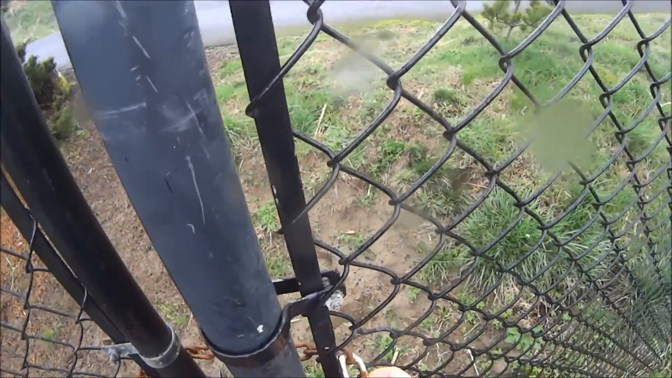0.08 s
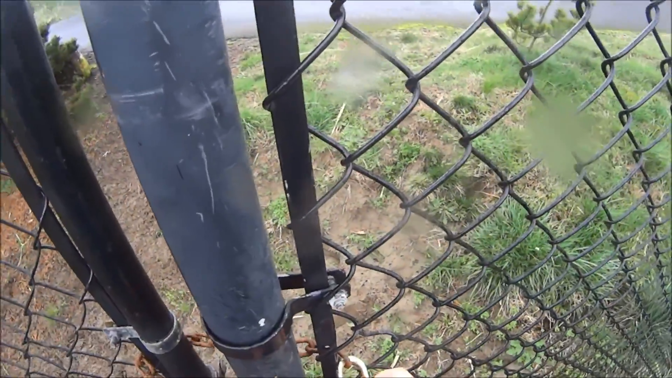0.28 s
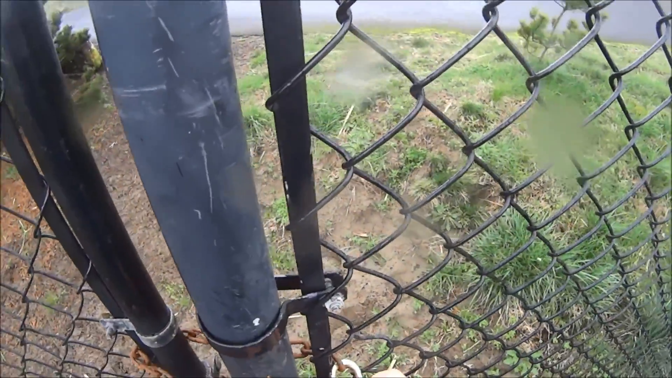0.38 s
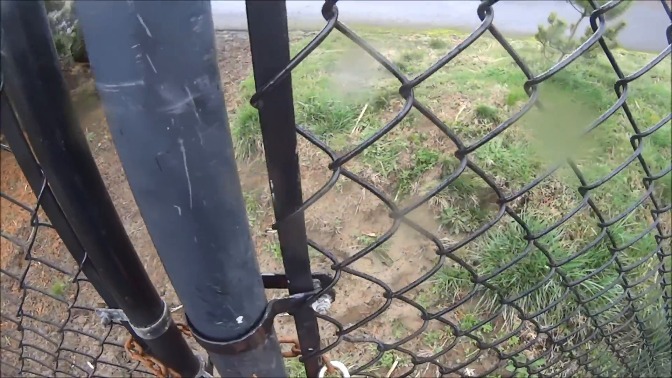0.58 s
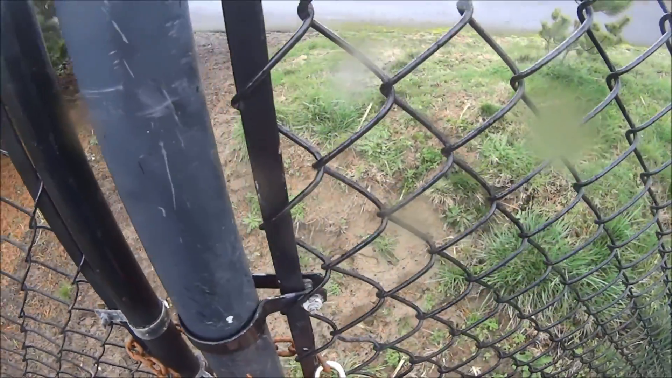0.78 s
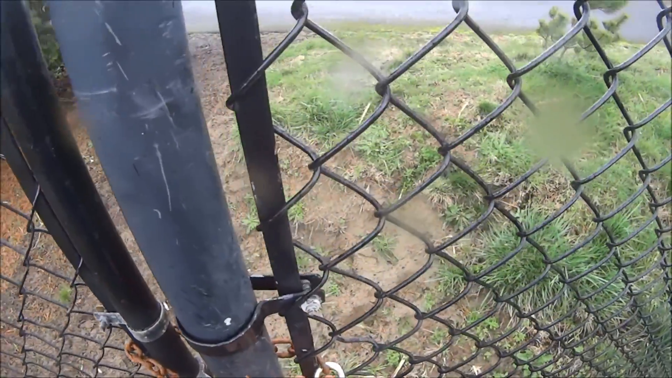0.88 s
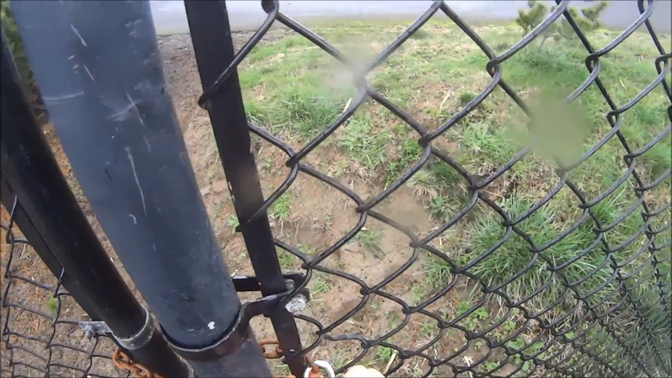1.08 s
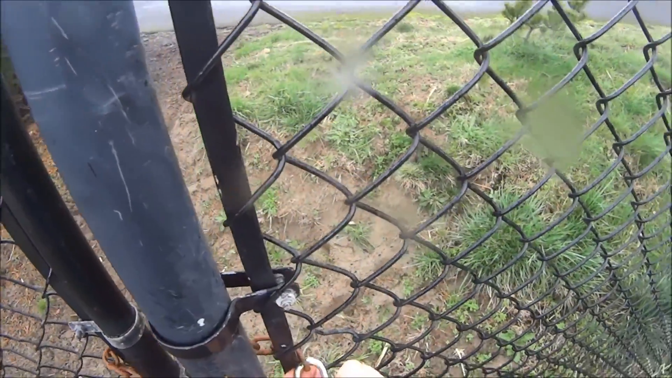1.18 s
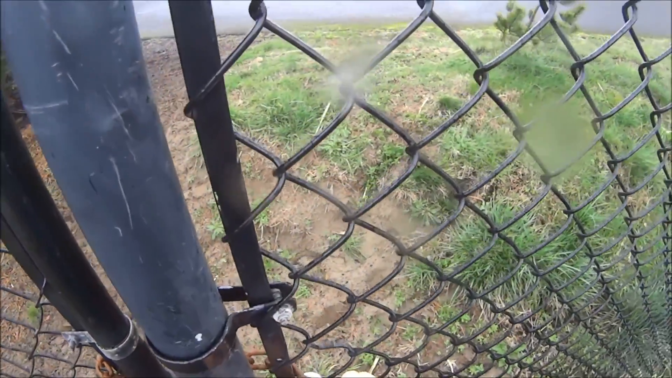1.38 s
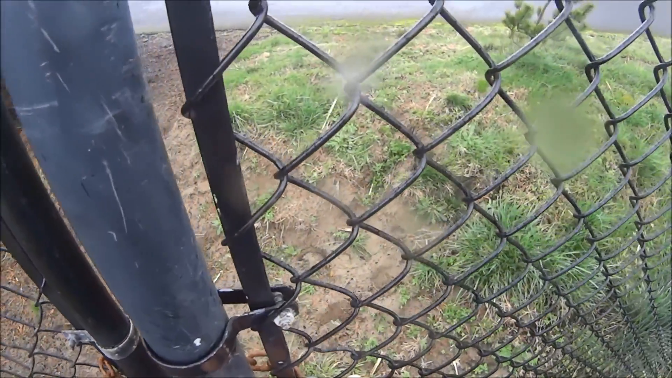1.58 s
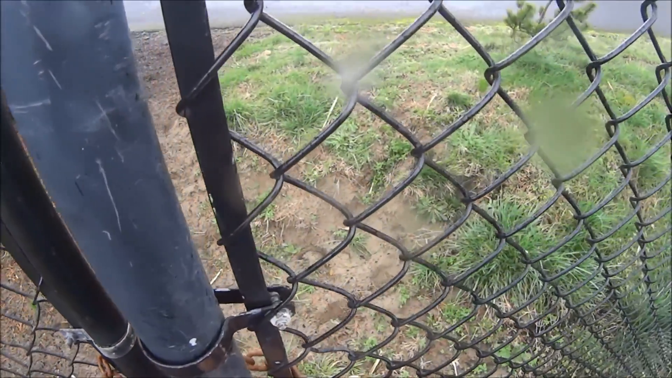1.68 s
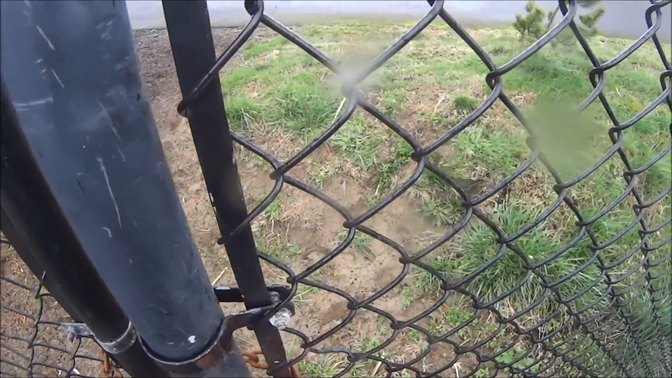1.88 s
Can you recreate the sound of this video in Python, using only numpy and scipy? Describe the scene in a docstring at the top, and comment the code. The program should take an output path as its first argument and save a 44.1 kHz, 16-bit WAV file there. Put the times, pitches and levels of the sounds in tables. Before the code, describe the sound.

A chain-link gate rattles close by as it is latched. Wire mesh rustles and ticks with dull hollow taps through the first half second. The steel latch clinks sharply three times around 0.4 to 0.5 seconds, rasps briefly near 0.65 and 0.9, and clinks again from 1.05 to 1.3. More taps follow, then a dead knock and small scrape at 1.8. Faint hiss and wind rumble continue throughout.

```python
"""Wire mesh rustles and ticks over faint outdoor air and wind rumble: a chain-link gate is being
handled and latched, close to the stereo microphone of a small camera. Dull taps ring briefly in
something small and hollow. The steel latch clinks as it is struck and rasps as it slides,
and one dead knock comes near the end. The fence rings on after each blow."""
import sys
import numpy as np
from scipy import signal
from scipy.fft import rfft, irfft
from scipy.io import wavfile

SR = 44100
rng = np.random.default_rng(int(sys.argv[2]) if len(sys.argv) > 2 else 0)


def master_out(mix):
    """Clip the mix to full scale and print it as 16-bit PCM to the path in sys.argv[1]."""
    frames = np.transpose(np.atleast_2d(mix))
    ceiling = np.clip(frames, -1, 1)
    pcm = np.round(ceiling * 32767).astype(np.int16)
    wavfile.write(sys.argv[1], SR, pcm)


N = 83790
T = np.arange(8192) / SR  # time axis of one contact, s
HZ = np.fft.rfftfreq(len(T), 1 / SR)
TAP_LIKENESS, TAP_SNAP, WIRE_LIKENESS = 0.49, 0.2, 0.81  # likeness: 1 is the same left and right

# how strongly the mesh stirs: t/s, level/dB
MESH_MOTION = [(0, -48.5), (.085, -41.5), (.13, -56), (.23, -43), (.35, -55.5), (.42, -47), (.6, -64),
               (1.1, -62.5), (1.9, -83)]
# main modes of the steel latch, a low pair and a high pair: f/Hz, t60/s
LATCH_MODES = [(2218, 0.16), (2342, 0.054), (6335, 0.11), (6555, 0.038)]
# spectrum of steel meeting steel: f/Hz, level/dB
STEEL_COLOUR = [(300, -51), (1000, -16), (1870, -9), (2300, -1.5), (4400, -5), (5400, -14.5), (7200, -12),
                (11000, -27.5)]


def amp(db):
    """Decibels to gain."""
    return 10 ** (np.asarray(db) / 20)


def unit(x):
    """Scales to rms 1."""
    return x / np.sqrt(np.mean(x ** 2) + 1e-20)


def read(points, hz):
    """Reads a curve on a log-frequency axis."""
    f, value = np.transpose(points)
    return np.interp(np.log(hz + 1), np.log(f), value)


def add(mix, start, sound):
    """Mixes a stereo sound in at start seconds."""
    part = mix[:, max(round(start * SR), 0):][:, :sound.shape[1]]
    part += sound[:, :part.shape[1]]


def stereo_noise(likeness, size):
    """Left and right noise that share the given part of their power."""
    noise = rng.standard_normal((3, size))
    return np.sqrt(likeness) * noise[0] + np.sqrt(1 - likeness) * noise[1:]


def colour(x, points, tilt_db=0):
    """Minimum-phase filter with the given spectrum, tilted by tilt_db an octave above 2 kHz."""
    octaves = np.log2(np.maximum(HZ, 2000) / 4000)
    log_gain = np.log(amp(read(points, HZ) + tilt_db * octaves))
    log_response = np.conj(signal.hilbert(np.r_[log_gain, log_gain[-2:0:-1]]))
    impulse = np.fft.ifft(np.exp(log_response)).real
    return signal.fftconvolve(x, impulse[None, :len(T) // 4], axes=1)[:, :x.shape[1]]


def resonate(x, hz, width_hz):
    """One resonance of peak gain 1."""
    return signal.lfilter(*signal.iirpeak(hz, hz / width_hz, SR), x)


def contact(t60, likeness, snap=0):
    """A snap and a dying chatter, with an even spectrum and energy 1."""
    fade = amp(-60 * T / t60)
    chatter = unit(stereo_noise(likeness, len(T)) * fade) / np.sqrt(len(T))
    chatter[:, 0] += snap
    for _ in range(2):  # flatten the spectrum, then restore the decay
        spectrum = rfft(chatter)
        chatter = irfft(spectrum / (abs(spectrum) + 1e-9)) * np.sqrt(fade)
    return unit(chatter) / np.sqrt(len(T))


def friction(per_s, spread_db):
    """Tiny slips of uneven size at random moments, nearly alike left and right."""
    slipping = rng.random(N) < per_s / SR
    size = amp(spread_db * np.minimum(rng.exponential(1, N), 4))
    return stereo_noise(0.94, N) * slipping * size


def outdoor_air():
    """Wide, faint hiss over a low wind rumble in the centre."""
    # spectrum of the air: f/Hz, relative level/dB
    air_colour = [(12, 6), (20, 2.5), (416, -14.5), (1560, -11), (1930, -20.5), (2260, -7), (3020, -18.5),
                  (4850, -18), (11000, -22.5), (14300, -66)]
    # left-right likeness of the air: f/Hz, shared part of the power
    air_likeness = [(60, 1), (200, 0.032)]
    hz = np.fft.rfftfreq(N, 1 / SR)
    likeness = read(air_likeness, hz)
    noise = rfft(rng.standard_normal((3, N)))
    spectrum = np.sqrt(likeness) * noise[0] + np.sqrt(1 - likeness) * noise[1:]
    return amp(-54) * unit(irfft(spectrum * amp(read(air_colour, hz)), N))


def mesh_rustle():
    """Wires rub in short soft slips, each ringing the mesh in its own mix of resonances."""
    # resonances of the wires: f/Hz, relative level/dB
    wire_modes = [(2350, -1), (5150, -1), (7400, -1), (10300, -1.5)]
    slips = friction(per_s=260, spread_db=3)
    rings = 0
    for hz, db in wire_modes:
        uneven = slips * amp(rng.uniform(-4.9, 4.55, N))
        rings += amp(db) * resonate(uneven, hz, width_hz=1100)
    rustle = signal.fftconvolve(rings, contact(0.036, WIRE_LIKENESS), axes=1)[:, :N]
    level_db = np.interp(np.arange(N) / SR, *np.transpose(MESH_MOTION))
    return amp(level_db) * unit(rustle)


def along_fence(x):
    """Bending waves carry the treble along the fence faster than the bass."""
    delay_at_1khz_s = 0.000451
    return irfft(rfft(x) * np.exp(-4j * np.pi * delay_at_1khz_s * np.sqrt(1000 * HZ)))


def hollow_tap(low_db, mid_db, upper_db, top_db, click_db):
    """A click, then damped hollow resonances; sharp, heavy blows also wake the deepest."""
    # resonances of the small hollow body: f/Hz, width of each of two filter passes/Hz
    hollow_modes = [(700, 132), (850, 185), (1290, 303), (1630, 235), (2230, 292)]
    # spectrum of the click: f/Hz, level/dB
    click_colour = [(500, -23), (1500, -5), (5200, -0.5), (8000, -20.5)]
    blow = contact(0.035, TAP_LIKENESS, TAP_SNAP)
    deepest_db = (low_db + click_db) / 2
    body = 0
    for (hz, width), db in zip(hollow_modes, [deepest_db, low_db, mid_db, upper_db, top_db]):
        hz *= 1 + rng.uniform(-0.0492, 0.037)  # each blow lands elsewhere
        body += amp(db) * resonate(resonate(blow, hz, width), hz, width)
    click = colour(contact(0.02, TAP_LIKENESS, TAP_SNAP), click_colour)
    return along_fence(body) + amp(click_db) * click


def patter():
    """Many faint taps at irregular moments, stronger while the mesh moves."""
    per_s = 35
    count = int(np.ceil(N / SR * per_s))
    times, motion_db = np.transpose(MESH_MOTION)
    out = np.zeros((2, N))
    for start in (np.arange(count) + rng.random(count)) / per_s:
        stir_db = 0.21 * (np.interp(start, times, motion_db) - motion_db.mean())
        low, mid, upper, top, click = rng.normal(stir_db - 8, 3, 5)
        add(out, start, hollow_tap(low - 3, mid, upper, top, click - 14))
    return out


def wire_ticks():
    """The mesh wires tick in short, bright contacts."""
    # wire contacts: t/s, level/dB
    ticks = [(0.034, -8.5), (.053, -14), (0.183, -14.5), (0.232, -11), (0.2437, 4.5), (.282, -9.5),
             (0.408, -11.5), (0.422, -13.5), (.536, -13.5), (0.6226, -23), (.833, -18.5), (.903, -11.5),
             (1.029, -13), (1.174, -2)]
    # spectrum of a tick: f/Hz, level/dB
    tick_colour = [(400, -40), (1500, -3), (2300, -8.5), (5000, 0), (7500, -4), (10500, -6)]
    out = np.zeros((2, N))
    for start, db in ticks:
        add(out, start, amp(db) * colour(contact(0.028, WIRE_LIKENESS, snap=0.54), tick_colour))
    return out


def dull_taps():
    """Distinct blows ring the hollow body as the gate is handled."""
    # blows: t/s, level/dB of the four upper hollow resonances from low to high, click level/dB
    blows = [(0.0752, -1, -11, 10.5, 8.5, -1.5), (0.1556, 1.5, 3, 1, -19, -29),
             (0.2498, 12.5, 7, 14, 11.5, -15), (.678, 8, 3, 7, 10.5, -15), (0.7179, -4, -5, 1, 5.5, -10.5),
             (0.7834, 7, 14.5, 8.5, 10.5, -4.5), (1.051, -19, -3.5, -24, -14, 0),
             (1.1227, 11.5, 12, 17, 23, 8), (1.208, -17, -3, 5.5, 4.5, -12),
             (1.4739, 10, 9, 11, -19, -14.5), (1.5378, 0, 9, 10.5, 6, -9.5), (1.558, -1, 1, 19.5, 8, -6.5),
             (1.643, -15, -1.5, -0.5, -17, -14), (1.692, -10, -6.5, 4.5, -4.5, -18.5),
             (1.7317, -4.5, 1, -14, 0.5, -9.5)]
    out = np.zeros((2, N))
    for start, *levels_db in blows:
        add(out, start, hollow_tap(*levels_db))
    return out


def steel_mode(hz, db, t60, spread_turns):
    """One dying partial of the latch, spread_turns apart in phase between left and right."""
    turns = hz * T + rng.random() + spread_turns * np.array([[0.5], [-0.5]])
    return amp(db - 60 * T / t60) * np.sin(2 * np.pi * turns)


def latch_clinks():
    """Steel hits the latch: a crack, a dense clash, then its modes ring on."""
    # strikes: t/s, clash level/dB, treble tilt/(dB per octave), level/dB of each main mode
    strikes = [(0.3697, 9.5, 5, -27.5, -14.5, -20, -16), (0.4755, 15, 4, -37, -19, -21, -10.5),
               (.5008, 9, 4, -44, -23.5, -24.5, -16), (1.0502, -4, -1, -33.5, -27.5, -47, -37),
               (1.1845, 6, 0.5, -33, -30, -21, -22), (1.325, 5, -5, -31, -20, -37, -50)]
    # weaker latch modes, which follow the clash: f/Hz, relative level/dB, t60/s
    weak_modes = [(2611, -41, 0.08), (2765, -42, .08), (2852, -41, 0.08), (3832, -38, .045),
                  (4100, -39, 0.028), (4950, -36.5, 0.028), (6876, -37, 0.03), (7468, -36.5, 0.028),
                  (8560, -40, 0.024)]
    rise_s, lean_left = 0.00192, amp([[3.5], [-3.5]])
    out = np.zeros((2, N))
    for start, clash_db, tilt_db, *mode_db in strikes:
        main = [steel_mode(hz, db, t60, 0.089) for (hz, t60), db in zip(LATCH_MODES, mode_db)]
        ring = lean_left * sum(main[:2]) + sum(main[2:])
        for hz, db, t60 in weak_modes:
            ring += steel_mode(hz, db + clash_db + tilt_db * np.log2(hz / 4000), t60, 0.1)
        clash = contact(t60=0.078, likeness=0.87, snap=0.17)
        crack = amp(-3) * contact(t60=0.036, likeness=0.87)
        hit = amp(clash_db) * colour(clash + crack, STEEL_COLOUR, tilt_db)
        add(out, start, hit + ring * np.minimum(T / rise_s, 1))
    return out


def latch_scrapes():
    """Dense slips of the sliding latch rasp and leave three of its main modes ringing."""
    # steel sliding on steel: middle t/s, half length/s, level/dB, gain of the high ring/dB
    slides = [(0.652, 0.0054, -51, 28.5), (0.904, 0.021, -44, 21), (1.826, 0.0025, -42, 10),
              (1.844, 0.0089, -46, -4)]
    t = np.arange(N) / SR
    rasp = unit(colour(friction(per_s=1500, spread_db=2.2), STEEL_COLOUR))
    out = np.zeros((2, N))
    for middle, half_length, db, high_db in slides:
        slips = rasp * amp(db) * np.exp(-0.5 * ((t - middle) / half_length) ** 2)
        low, twin, high = (resonate(slips, hz, np.pi / t60) for hz, t60 in LATCH_MODES[:3])
        out += slips + amp(11) * (low + twin) + amp(high_db) * high
    return out


def dead_knock():
    """One blow that dies almost at once."""
    # spectrum of the knock: f/Hz, level/dB
    knock_colour = [(80, -18), (650, -11.5), (1500, 0.5), (2200, -17), (10000, -30.5)]
    return amp(9.1) * colour(contact(0.013, TAP_LIKENESS, TAP_SNAP), knock_colour)


def fence_ring(gate):
    """The fence rings on briefly after every contact at the gate."""
    # spectrum of the ringing fence: f/Hz, level/dB
    fence_colour = [(400, -1), (900, 16.5), (2600, 3.5), (11000, -5.5)]
    t60, size = 0.066, N // 2
    fade = amp(-60 * np.arange(size) / SR / t60)
    tail = unit(stereo_noise(0.98, size) * fade) / np.sqrt(size)
    return amp(-22.5) * signal.fftconvolve(gate, colour(tail, fence_colour), axes=1)[:, :N]


def scene():
    """The gate from close by, with the fence ringing and open air around it."""
    gate = latch_scrapes() + mesh_rustle() + patter() + latch_clinks() + dull_taps() + wire_ticks()
    add(gate, start=1.7968, sound=dead_knock())
    return gate + fence_ring(gate) + outdoor_air()


def record(dry):
    """The small camera's microphone: the treble drops by a steep step, then ends."""
    shelf_hz, shelf_db, edge_hz = 11077, -35, 15800
    below_shelf = signal.oaconvolve(dry, signal.firwin(127, shelf_hz, fs=SR)[None], "same")
    shelved = below_shelf + amp(shelf_db) * (dry - below_shelf)
    lowpass = signal.firwin(255, edge_hz, window=("kaiser", 9), fs=SR)
    return signal.oaconvolve(shelved, lowpass[None], "same")


dry = scene()
out = record(dry)
master_out(out)
```